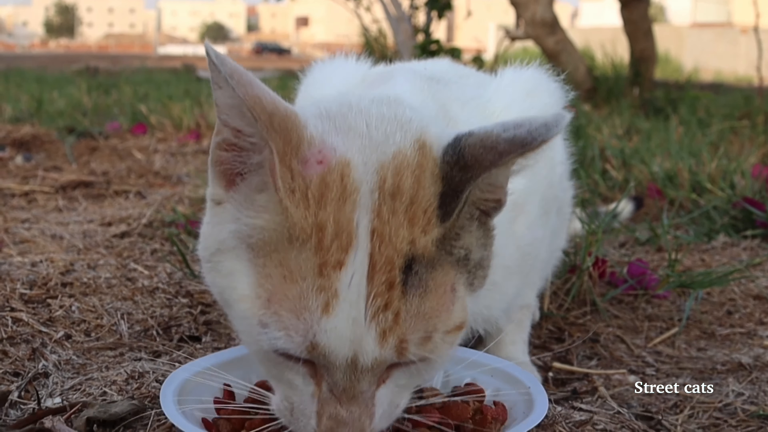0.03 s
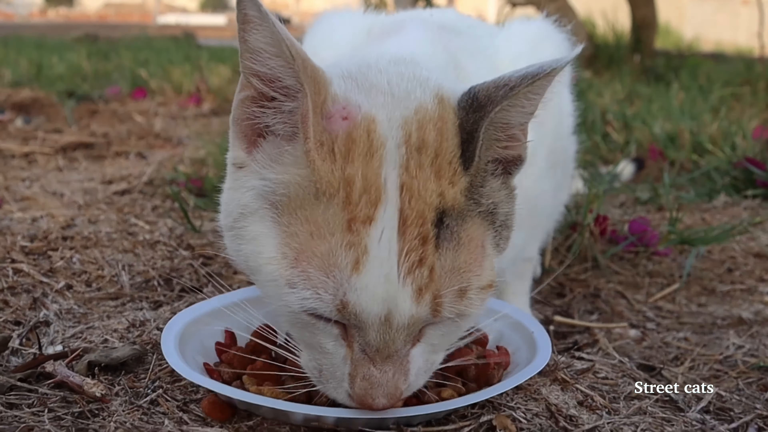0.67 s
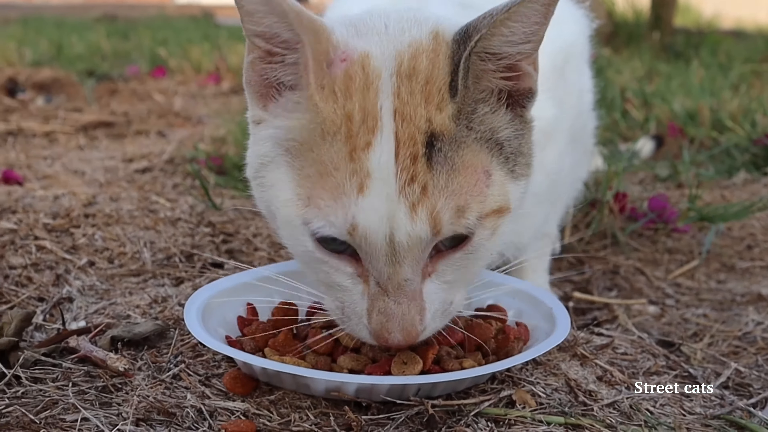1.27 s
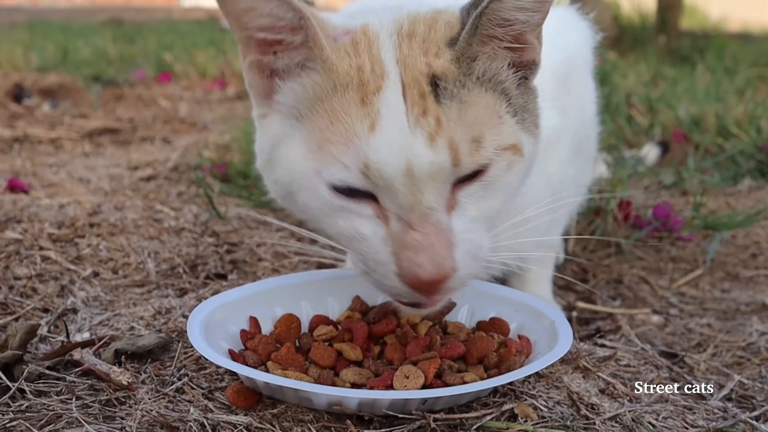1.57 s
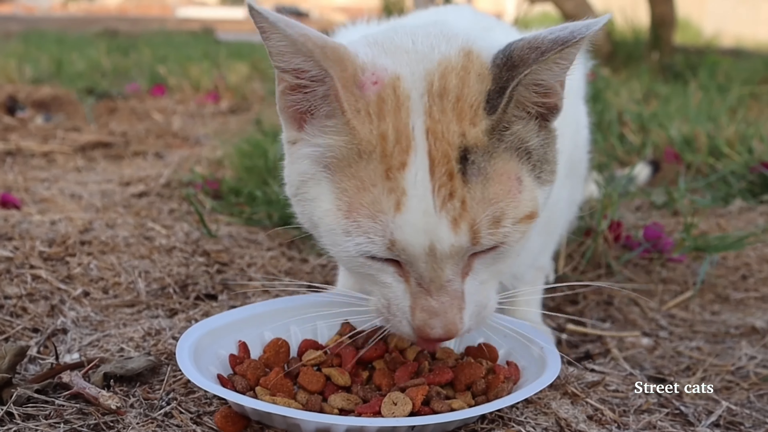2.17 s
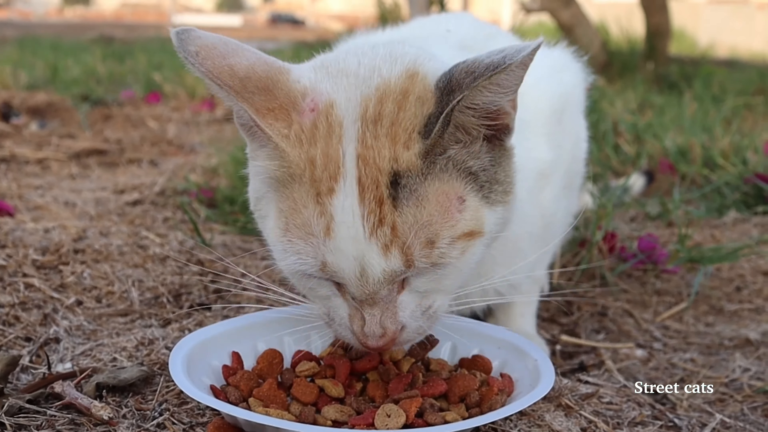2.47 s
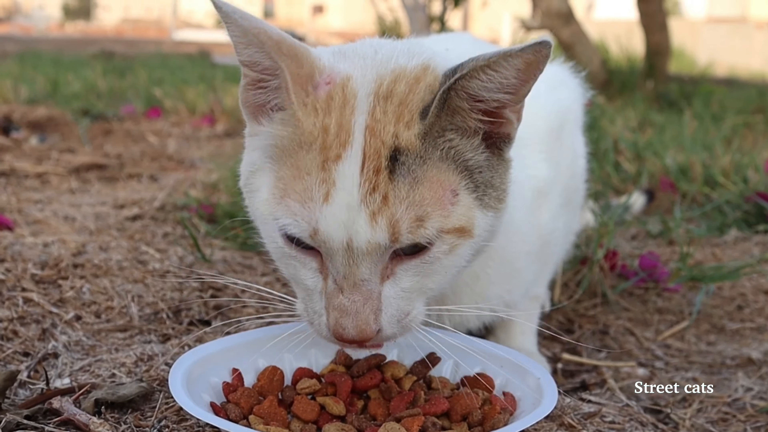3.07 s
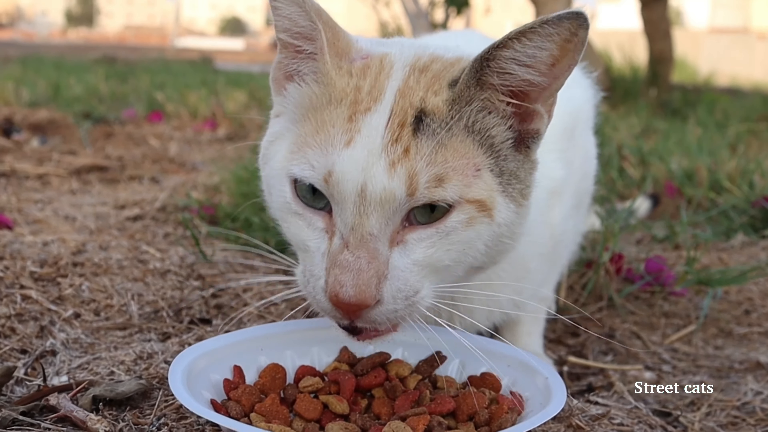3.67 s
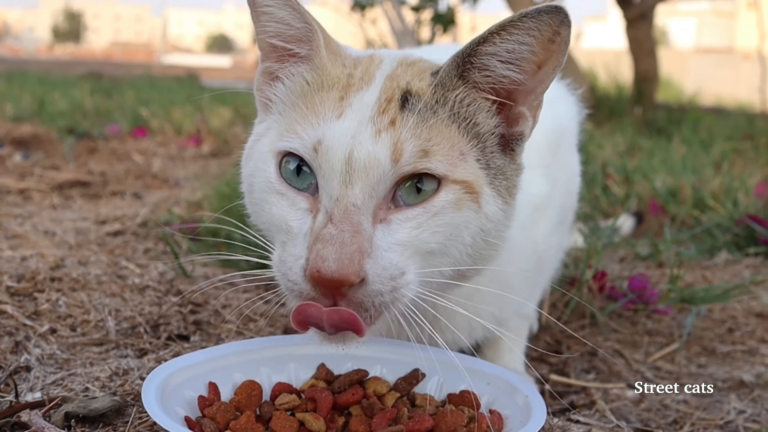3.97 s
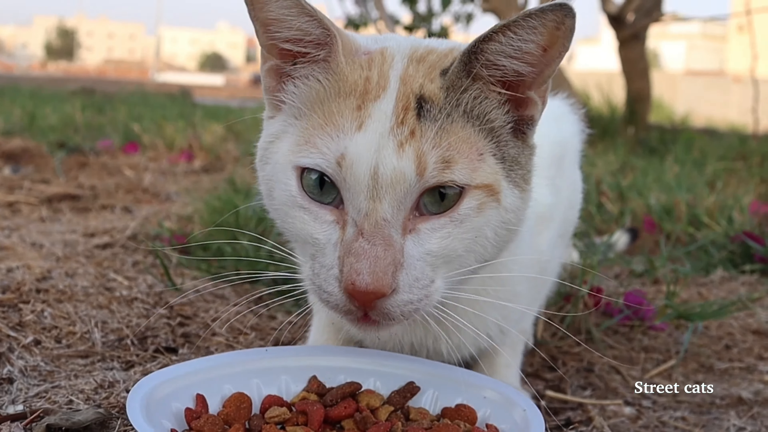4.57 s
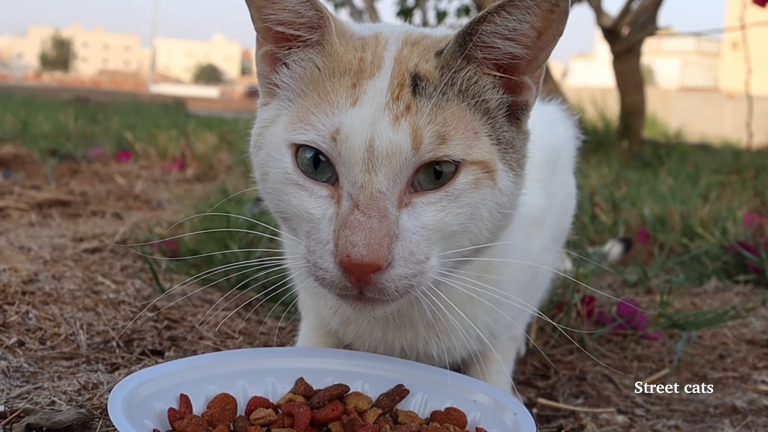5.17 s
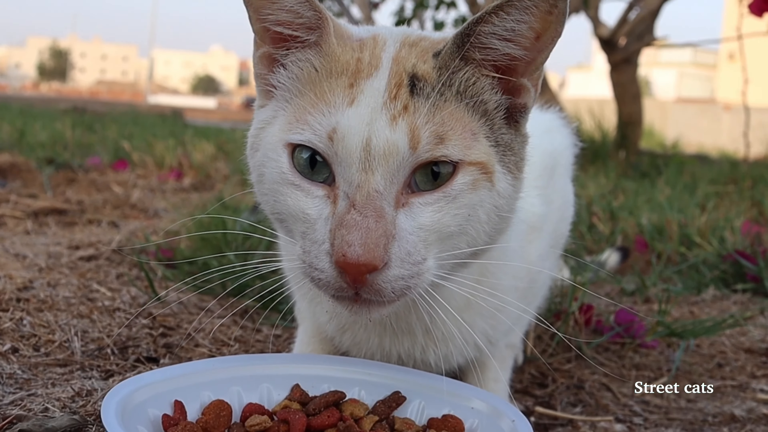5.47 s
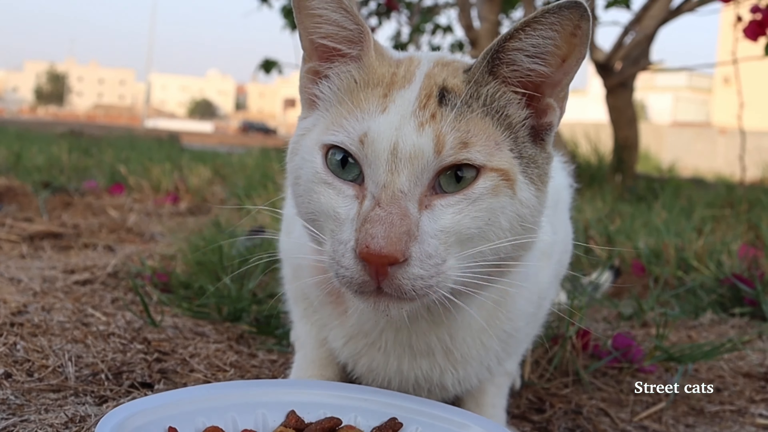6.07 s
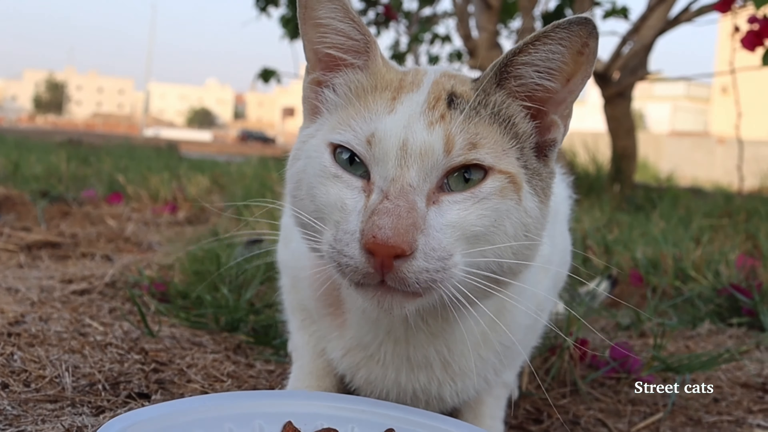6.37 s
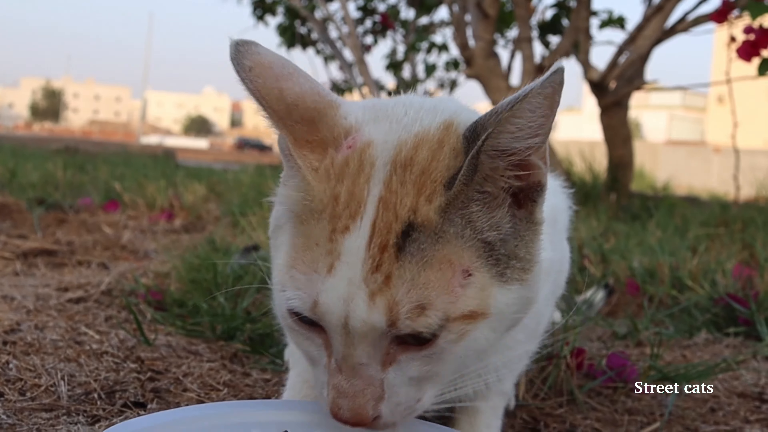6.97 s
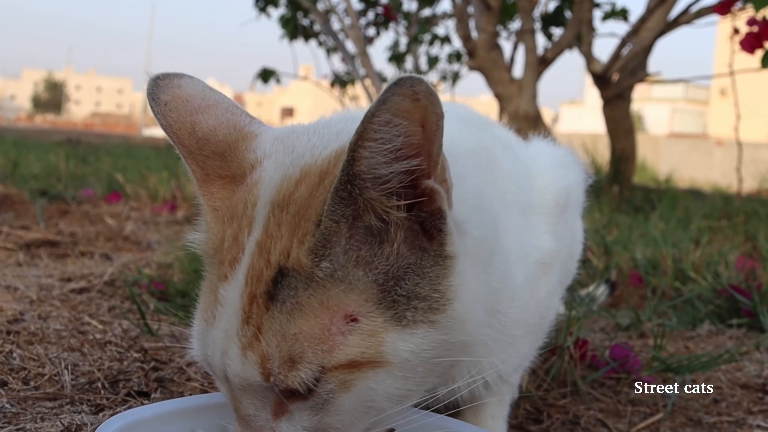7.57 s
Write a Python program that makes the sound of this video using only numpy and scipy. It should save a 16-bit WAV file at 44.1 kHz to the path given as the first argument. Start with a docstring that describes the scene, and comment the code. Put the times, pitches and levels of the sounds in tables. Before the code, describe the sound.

A cat eats close to the microphone in a garden. A steady low town rumble and faint hiss run throughout, with small birds chirping, twittering and giving thin buzzy notes some way off, slightly echoing. From about 0.4 to 0.8 seconds, dry kibble rattles and knocks in a plastic dish, mostly on the left. Tooth taps, soft wet smacks and chewing ticks follow from 1 to 1.6 seconds, with more smacks around 2.3. At 2.6 seconds comes one sharp crunch, the loudest sound, followed by smaller cracks until 2.9. The tongue smacks lightly at 3.3 and just before 4 seconds. Then the birds and rumble are mostly alone, apart from single licks near 5.9 and 6.3 seconds. The chirping gets a little busier just after 7 seconds. From 7.4 to 7.8 seconds, the cat stirs the pellets again and its teeth click quickly against them.

```python
"""In a garden, a cat eats dry kibble from a plastic dish, close to two spaced microphones.
Pellets fracture between its teeth, impacts excite short damped rings, and its tongue smacks.
Its muzzle stirs the heap, and the dish's resonances colour the rattle.
Some way off, small birds chirp and wheeze in frequency-modulated tones that echo from walls and trees,
over the steady rumble of a town and a faint microphone hiss."""
import sys
import numpy as np
from scipy import signal
from scipy.fft import rfft, irfft
from scipy.io import wavfile
from scipy.ndimage import uniform_filter1d

SR = 44100
rng = np.random.default_rng(int(sys.argv[2]) if len(sys.argv) > 2 else 0)


def unload_audio(sound):
    """Save the sound as a 16-bit wav file, at the path given as the first command line argument."""
    columns = np.transpose(np.atleast_2d(sound))
    # keep every value between -1 and 1, then stretch to whole-number steps
    steps = np.round(np.clip(columns, -1, 1) * 32767)
    wavfile.write(sys.argv[1], SR, steps.astype(np.int16))


N = 344421
BURST_SAMPLES = 2048
HZ, AGE = np.fft.rfftfreq(BURST_SAMPLES, 1 / SR), np.arange(BURST_SAMPLES) / SR  # a burst's f/Hz, t/s


# modes of the jaw: f/ring f, level/dB
JAW_MODES = [(1, 0), (.65, -2)]
# spectrum of the splinters: f/Hz, level/dB
SPLINTER_SPECTRUM = [(400, -64.5), (950, -19), (1250, 3.5), (2000, 4.5), (3000, 3), (3800, 0), (5000, 5.5),
                     (6000, 1), (6700, -2), (8000, -1), (9300, -23), (11500, -18.5), (14700, -5),
                     (15700, -11), (16500, -24)]
# directivity of a bite, its top treble beamed to the right: f/Hz, L-R/dB
BITE_DIRECTIVITY = [(7000, 1), (11500, -26), (15000, -25.5)]
# pellets breaking: t/s, ring level/dB, ring f/Hz, splinter level/dB, splinter decay/s, L-R/dB
CRACKS = [(.793, -39, 1800, -39, .002, -5), (1.2062, -47, 2000, -34, 0.0013, -14),
          (2.5993, -11.5, 1980, -16.5, .0009, -4), (2.6096, -21, 2050, -20, .001, -4),
          (2.619, -47, 2200, -33, 0.0018, 1), (2.7486, -35, 1800, -23, 0.0014, 2),
          (2.7977, -37, 3400, -35, 0.00041, 0), (2.8957, -32.5, 3400, -27.5, 0.0016, 5)]

def cracks(ring_decay_s=.0005, rise_s=.00035):
    """Brittle fracture: a pellet gives way, and the jaw rings briefly under a spray of splinters."""
    out = np.zeros((2, N))
    colour = read(SPLINTER_SPECTRUM, HZ) + np.array([[.5], [-.5]]) * read(BITE_DIRECTIVITY, HZ)
    for s, ring_db, hz, splinter_db, splinter_decay_s, pan_db in CRACKS:
        jaw = sum(amp(db) * np.sin(2 * np.pi * ratio * hz * AGE) for ratio, db in JAW_MODES)
        ring = np.gradient(-jaw * envelope(ring_decay_s, rise_s))
        splinters = coloured(burst(splinter_decay_s, rise_s, apart=.47), colour)
        add(out, s, amp(ring_db) * panned(pan_db) * one_ms(ring))
        add(out, s, amp(splinter_db) * panned(pan_db) * one_ms(splinters))
    return out


# spectrum of a struck pellet: f/Hz, level/dB
PELLET_SPECTRUM = [(300, -19), (1000, 0.5), (1450, 7), (2000, 6.5), (3200, 6), (5600, -1), (7500, -10),
                   (10000, -10), (13000, -13.5), (16000, -25)]
# teeth closing on a pellet: t/s, level/dB, ring f/Hz, tilt/(dB per octave), L-R/dB
TOOTH_TAPS = [(.984, -29.5, 1140, 0.5, 7), (1.2215, -28, 1480, 5, 12), (2.363, -35, 2010, -7, -2),
              (2.389, -36.5, 3220, -3, -4), (7.4372, -34, 3330, -3, -5), (7.4574, -26, 2700, -12, -6),
              (7.5004, -26.5, 2760, -14, -4), (7.516, -35, 3300, -10, -4), (7.571, -35, 2040, -6, -4),
              (7.5984, -29, 2400, -4, -3), (7.6138, -33, 3900, 5, -2), (7.6225, -34, 3400, 1, 1),
              (7.6598, -33, 1590, -3, -4), (7.6962, -36.5, 1890, -6, -6), (7.7353, -31, 2340, -11, 1),
              (7.744, -31.5, 2930, -3, -4), (7.7962, -36, 2600, 1.5, -1)]

def tooth_taps():
    """Impact excitation: a tooth strikes a pellet and sets off a short, damped ring."""
    out = np.zeros((2, N))
    for s, db, hz, tilt_db, pan_db in TOOTH_TAPS:
        colour = tilted(PELLET_SPECTRUM, tilt_db)
        tap = contact(colour, hz, decay_s=.0027, rise_s=.00013, ring_db=11, ring_octaves=.37)
        add(out, s, amp(db) * panned(pan_db) * tap)
    return out


# modes of the plastic dish: f/Hz, half width/Hz, lift/dB
DISH_MODES = [(1980, 190, 7.5), (3160, 57, 6.5), (3940, 110, 2), (4860, 110, 7), (5540, 260, 9),
              (6800, 200, 7)]

def dish_lift():
    """Modal resonance: each mode of the dish adds a bell-shaped peak, in dB, to the spectrum."""
    return sum(db / (1 + ((HZ - hz) / half_width) ** 2) for hz, half_width, db in DISH_MODES)


# pellets hitting the dish: t/s, level/dB, ring f/Hz, tilt/(dB per octave), L-R/dB
KNOCKS = [(.4063, -36, 5470, 10, 9), (.4136, -35, 5400, 8, 8), (0.4236, -28, 2880, 9, -3),
          (0.4267, -26, 2100, 6, 4), (0.4343, -28, 4000, 1, 10), (0.439, -23, 3800, 4, 6),
          (.4445, -31, 3000, 5, 7), (.4771, -33, 4660, 0, 8), (0.4833, -31, 3120, -1, 9),
          (0.5117, -37, 5400, 2, 10), (0.5185, -32.5, 5400, 2, 14), (0.541, -40, 5500, 4, 12),
          (.55, -29.5, 5250, 3, 14), (.5754, -39, 5400, 0, 6), (0.601, -31, 1850, -4, -3),
          (.6845, -46, 9000, 12, 8), (0.7155, -30.5, 2130, 12, 8), (.7208, -27, 2570, 9.5, 11),
          (0.73, -28, 1950, -9, -5), (.778, -35, 1900, 8, -8), (0.7935, -23.5, 1670, -1, -3),
          (0.803, -35, 2700, 5, 5), (0.812, -35, 2200, 6, 6), (.819, -34, 2200, 6, 6),
          (0.8271, -37, 3100, 10, 6)]

def knocks():
    """Impact on a resonator: a pellet's knock is coloured by the modes of the dish."""
    out = np.zeros((2, N))
    for s, db, hz, tilt_db, pan_db in KNOCKS:
        colour = tilted(PELLET_SPECTRUM, tilt_db) + dish_lift()
        knock = contact(colour, hz, decay_s=.0018, rise_s=.00021, ring_db=11.5, ring_octaves=.4)
        add(out, s, amp(db) * panned(pan_db) * knock)
    return out


# the muzzle shoving the heap:
# centre t/s, half length/s, level/dB, tilt/(dB per octave), L-R/dB, share of the dish's lift
SHOVES = [(0.416, .005, -41, 3, 11, .9), (0.434, 0.0095, -33.5, 3, 15, 1), (0.455, .004, -41, 3, 8, .8),
          (0.482, 0.0078, -43.5, 4, 9, 1), (0.536, 0.049, -48, 0, 3, 1), (0.604, 0.0059, -46, -7, 2, .5),
          (0.723, 0.017, -38, -0.5, 10, 0.9), (0.777, .042, -44.5, -3, -3, 0.8),
          (0.824, 0.0065, -39, 2.5, 6, 0.5), (7.45, 0.011, -38, -12, -3, 0.1),
          (7.499, 0.02, -42.5, -6.5, -2, 0), (7.582, 0.029, -43.5, -7, -2, .3),
          (7.618, 0.015, -38.5, 1.5, -6, 0), (7.734, 0.014, -47.5, -4, -3, .3)]

def shoves(contacts_per_s=2000, spread_db=2, pellets=6):
    """Granular noise: many tiny random collisions among a few pellets merge into a swelling rattle."""
    out = np.zeros((2, N))
    t = np.arange(-SR // 10, SR // 10) / SR
    for s, half_s, db, tilt_db, pan_db, dish_share in SHOVES:
        swell = np.exp(-.5 * (t / half_s) ** 2)
        sizes = amp(spread_db * rng.standard_normal((pellets, len(t))))
        hits = rng.random(sizes.shape) < contacts_per_s / pellets / SR
        rattle = sum(signal.fftconvolve(train[None], burst(decay_s=.00072, rise_s=.0003), axes=1)
                     for train in sizes * hits * swell)
        rattle = coloured(rattle, tilted(PELLET_SPECTRUM, tilt_db) + dish_share * dish_lift())
        swell_rms = np.sqrt(np.sum(swell ** 2) / rattle.shape[1])
        add(out, s + t[0], amp(db) * panned(pan_db) * unit_rms(rattle) * swell_rms)
    return out


# spectrum of a wet smack: f/Hz, level/dB
TONGUE_SPECTRUM = [(500, 8.5), (1500, 4), (3000, 0), (5500, 0.5), (8000, -4), (11000, -8), (15500, -5)]
# shelf in the top treble: f/Hz, share of a smack's treble lift
TREBLE_SHELF = [(9000, 0), (14000, 1)]
# lean of the smacks as the head turns: t/s, L-R/dB
FACING = [(1, 1), (1.4, 8), (3.9, 10), (5.9, -11.5), (7, -32)]
# spells of chewing: start t/s, end t/s, tick level/dB
CHEWS = [(1.195, 1.624, -41), (3.805, 3.962, -49)]
# tongue and lips: t/s, level/dB, ring f/Hz, tilt/(dB per octave), treble lift/dB
SMACKS = [(.9586, -35, 3100, 0, -7), (1.2575, -35, 5600, -2, -3), (1.2898, -34, 2100, -2.5, -3),
          (1.338, -35.5, 3000, 0, -3), (1.4593, -34, 6800, -6, 3), (1.4685, -41, 5600, -1, -3),
          (1.5953, -31, 6800, -6, 0), (1.603, -38, 6500, -1, 8), (2.2405, -40, 6900, -2, -15),
          (2.2485, -41, 5400, -1, -15), (2.3925, -34, 6750, -3, -18), (2.403, -37, 5600, -2, -17),
          (3.2856, -36, 5800, -4.5, -10), (3.9232, -38.5, 5900, -2, -12), (3.9292, -34.5, 6100, 2, -10),
          (3.9415, -31, 1990, -3, -12), (3.9475, -34, 5250, 5, -13), (5.8823, -34.5, 5900, 1, 4),
          (6.2815, -38.5, 8400, 10, -5)]

def smacks(tick_hz=7000, tick_tilt_db=-1, spread_db=3, ticks_per_s=24):
    """Separation of wet surfaces: tongue and lips part in noise bursts, and saliva ticks faintly."""
    out, events = np.zeros((2, N)), list(SMACKS)
    for start, end, db in CHEWS:
        for when, size in rng.random((ticks_per_s, 2))[:round(ticks_per_s * (end - start))]:
            tick_db = db + spread_db * (2 * size - 1)
            events.append((start + when * (end - start), tick_db, tick_hz, tick_tilt_db, 0))
    for s, db, hz, tilt_db, treble_db in events:
        colour = tilted(TONGUE_SPECTRUM, tilt_db) + treble_db * read(TREBLE_SHELF, HZ)
        smack = contact(colour, hz, decay_s=.0042, rise_s=.0009, ring_db=6, ring_octaves=.12)
        pan_db = np.interp(s, *np.transpose(FACING))
        add(out, s, amp(db) * panned(pan_db) * smack)
    return out


def contact(colour, hz, decay_s, rise_s, ring_db, ring_octaves):
    """Source and filter: a noise burst takes on a colour in dB and one resonance at hz."""
    resonance = ring_db / (1 + (np.log2((HZ + 1) / hz) / ring_octaves) ** 2)
    return one_ms(coloured(burst(decay_s, rise_s), colour + resonance))


def burst(decay_s, rise_s, apart=1):
    """Partial coherence: a dying noise, shared by both microphones, plus a part of their own."""
    noise = rng.standard_normal(BURST_SAMPLES) + apart * rng.standard_normal((2, BURST_SAMPLES))
    return noise * envelope(decay_s, rise_s)


def envelope(decay_s, rise_s):
    """Damping: after a quick rise, the amplitude decays exponentially."""
    return np.exp(-AGE / decay_s) * (1 - np.exp(-AGE / rise_s))


# sparrow-like arches of pitch: t/s, length/s, top f/Hz, place of the top (0-1), level/dB
CHIRPS = [(0.13, 0.055, 6500, .45, -48.5), (.234, .038, 5400, .55, -51), (.355, .034, 4400, .4, -48),
          (1.39, 0.04, 6800, .3, -52), (1.468, .04, 5700, 0.4, -54), (1.487, 0.037, 4350, .4, -51),
          (2.267, 0.055, 4900, 0.4, -44), (2.32, .044, 4420, .5, -43), (2.424, .052, 4700, .4, -48),
          (2.889, 0.045, 4720, 0, -41), (3.05, 0.046, 4760, 0.25, -42.5), (3.609, 0.053, 4800, 0.34, -46),
          (3.622, 0.038, 6800, .8, -57), (3.765, 0.052, 4600, 0.4, -42.5), (4.986, .045, 4920, 0.31, -45.5),
          (5.168, 0.043, 4680, .45, -46), (5.971, 0.045, 4600, 0.7, -43), (6.125, .026, 6600, .65, -50),
          (6.195, 0.049, 4400, .5, -49), (6.592, 0.04, 6650, .55, -53), (6.712, 0.033, 4950, 0.73, -46)]
# sharp points of pitch: t/s of the point, rise/s, fall/s, top f/Hz, level/dB
FLICKS = [(1.761, .012, .008, 5000, -48), (2.03, .014, .005, 5200, -46), (2.08, .014, .011, 5300, -47.5),
          (3.022, .01, .011, 4750, -48), (3.216, .01, .014, 6650, -55), (4.131, .012, .0092, 4570, -39.5),
          (4.438, .003, .013, 5060, -45), (4.506, .02, .01, 4750, -46), (5.506, .004, .012, 4500, -49),
          (5.564, .012, 0.0074, 4500, -43), (5.722, .007, .004, 4930, -39.5),
          (7.171, .0066, .011, 4680, -39.5), (7.197, .013, .016, 3180, -42),
          (7.368, .016, 0.021, 3540, -37), (7.391, .01, .012, 3700, -42), (7.413, .01, .019, 3630, -41)]
# straight glides: t/s, length/s, start f/Hz, end f/Hz, level/dB
SLIDES = [(0.93, .012, 4900, 5850, -49), (1.618, 0.071, 5200, 3360, -51), (1.8, .03, 6050, 6600, -57),
          (2.245, 0.029, 6000, 6600, -52), (2.49, .028, 6700, 6400, -58), (2.668, .03, 5900, 6400, -59),
          (2.768, 0.038, 5250, 4600, -46), (2.796, 0.023, 3400, 3800, -45), (2.974, 0.025, 3900, 3320, -40),
          (2.998, .016, 3350, 3650, -44), (3.036, 0.019, 3900, 2950, -41),
          (3.769, 0.0058, 5300, 3700, -36.5), (4.203, .018, 3400, 4030, -41), (4.234, .02, 3650, 3350, -46),
          (5.692, 0.027, 4450, 5050, -50), (5.946, .023, 5200, 4700, -49), (5.976, 0.021, 3350, 3470, -43),
          (6.013, 0.021, 3950, 3070, -40.5), (6.434, .028, 4400, 5100, -55), (7.12, .03, 3750, 3480, -44),
          (7.143, .036, 3050, 2840, -42), (7.195, .022, 2880, 2390, -46)]
# diving calls: t/s, top f/Hz, level/dB
DIVES = [(4.044, 5000, -40), (5.634, 5220, -42), (7.084, 5030, -39.5)]

def near_birds():
    """Frequency modulation: each kind of call is a whistle with its own pitch contour."""
    out = np.zeros((1, N))
    for s, length, top_hz, place, db in CHIRPS:
        add(out, s, amp(db) * chirp(length, top_hz, place))
    for s, rise_s, fall_s, top_hz, db in FLICKS:
        add(out, s - rise_s, amp(db) * flick(rise_s, fall_s, top_hz))
    for s, length, start_hz, end_hz, db in SLIDES:
        hz = np.linspace(start_hz, end_hz, round(length * SR))
        add(out, s, amp(db) * unit_rms(whistle(hz, waver=.019)))
    for s, top_hz, db in DIVES:
        add(out, s, amp(db) * dive(top_hz))
    return out


def chirp(length, top_hz, place, sag_octaves=.21, gap_hz=526, lower_db=1.5):
    """Biphonation: two voices, a constant step apart, rise to a top and sink again."""
    u = np.linspace(0, 1, round(length * SR))
    from_top = np.interp(u, [0, np.clip(place, .1, .9), 1], [-1, 0, 1])
    hz = top_hz * 2 ** (-sag_octaves * from_top ** 2)
    upper, lower = whistle(hz, waver=.006), whistle(hz - gap_hz, waver=.006)
    return unit_rms(upper + amp(lower_db) * lower)


def flick(rise_s, fall_s, top_hz, depth=.26, sweep_s=.0074):
    """Exponential sweeps: a thin note shoots up to a cusp and drops away."""
    t = np.arange(-rise_s, fall_s, 1 / SR)
    sag = depth * (1 - np.exp(-abs(t) / sweep_s))
    return unit_rms(whistle(top_hz * (1 - sag), waver=.0047))


def dive(top_hz, length=.045, turn=.44, climb_depth=.068, drop_depth=.306, swell_db=8):
    """Joint pitch and amplitude modulation: a rough note climbs a little, swells and suddenly drops."""
    u = np.linspace(0, 1, round(length * SR))
    climb = np.maximum(1 - u / turn, 0)
    drop = np.maximum(u - turn, 0) / (1 - turn)
    hz = top_hz * (1 - climb_depth * climb ** 2 - drop_depth * drop)
    return unit_rms(whistle(hz, waver=.025, smooth_samples=40) * amp(swell_db * (u - drop / 2)))


def whistle(hz, waver, smooth_samples=60):
    """Phase as the integral of frequency: a tone follows hz, wavers at random and fades in and out."""
    wavering_hz = hz * (1 + waver * jitter(len(hz), smooth_samples))
    phase = 2 * np.pi * np.cumsum(wavering_hz) / SR
    return (np.sin(phase) * signal.windows.tukey(len(hz), .15))[None]


def jitter(samples, smooth_samples):
    """Moving average: white noise is smoothed into a slower random wobble."""
    return unit_rms(uniform_filter1d(rng.standard_normal(SR // 2), smooth_samples))[:samples]


# constant faint twitter, with one fainter bout from 2.1 to 3.9 s: start t/s, end t/s, level/dB
TWITTER = [(0, 7.8, -50), (2.1, 3.9, -56), (5.1, 4.6, -56)]

def flock(spread_db=5, low_hz=3500, span_hz=2000, short_s=.0183, long_s=.053, calls_per_s=22):
    """Superposition: farther birds' random chirps and flicks, the higher ones fainter, form a twitter."""
    out = np.zeros((1, N))
    for start, end, db in TWITTER:
        for k, (when, pitch, stretch, place, size) in enumerate(rng.random((200, 5))):
            s = start + (k + when) / calls_per_s
            if s < end:
                span = short_s + stretch * (long_s - short_s)
                hz = low_hz + pitch * span_hz
                call = flick(place * span, (1 - place) * span, hz) if k % 2 else chirp(span, hz, place)
                add(out, s, amp(db + spread_db * (size - pitch)) * call)
    return out


# buzzy notes that sag in pitch: t/s, length/s, start f/Hz, level/dB
WHEEZES = [(.29, .09, 6420, -56), (0.968, .075, 6100, -50.5), (1.02, 0.084, 5570, -53),
           (1.932, 0.11, 5900, -53.5), (2.802, 0.087, 5820, -51), (4.084, .095, 5870, -49.5),
           (4.177, .09, 4900, -54), (4.785, .09, 5920, -49), (4.86, .08, 5710, -52),
           (5.622, .08, 6050, -53), (5.724, 0.087, 5370, -55), (6.35, 0.096, 5950, -54.5),
           (6.452, .075, 5330, -63), (7.268, 0.13, 5930, -52.5)]

def wheezes(shake_hz=61.2, shake_depth=.17, uneven=.84, sag=.0217, fade_db=-2):
    """Modulation sidebands: a fast, uneven, deepening shake of pitch makes a far bird's note buzz."""
    out = np.zeros((1, N))
    for s, length, start_hz, db in WHEEZES:
        u = np.linspace(0, 1, round(length * SR))
        pace = 1 + uneven * jitter(len(u), smooth_samples=400)
        shake = np.sin(np.pi * np.cumsum(shake_hz * pace) / SR) ** 2 * np.linspace(.5, 1, len(u))
        hz = start_hz * (1 - sag * u ** 2 - shake_depth * np.sqrt(u) * shake)
        note = whistle(hz, waver=.0096, smooth_samples=30) * amp(fade_db * u)
        add(out, s, amp(db) * unit_rms(note))
    return out


def garden(song, direct_db, echo_db, t60, lag_samples=7):
    """Multipath: song reaches the left microphone first and comes back from walls and trees."""
    direct = np.vstack([song, np.roll(song, lag_samples)])
    return amp(direct_db) * direct + amp(echo_db) * echoes(song, t60)


def echoes(x, t60):
    """Reverberation: scattered reflections, different at each microphone, fall 60 dB in t60 seconds."""
    t = np.arange(SR) / SR
    reflections = rng.standard_normal((2, SR)) * (rng.random((2, SR)) < .1) * amp(-60 * t / t60)
    return signal.fftconvolve(x, unit_rms(reflections) / np.sqrt(SR), axes=1)[:, :N]


# spectral density of the town's rumble: f/Hz, level/dB
TOWN_RUMBLE = [(15, -44), (27, -22), (40, -14.5), (50, -8.5), (62, -4), (90, -0.5), (120, -1), (200, 1),
               (290, -6), (460, -9), (680, -18), (850, -30.5), (1400, -53)]
# spectral density of the steady, faint microphone hiss: f/Hz, level/dB
MIC_HISS = [(470, -15.5), (800, -1), (1070, 0.5), (1610, -5), (1720, -4), (1970, -4), (2130, -5.5),
            (2980, -8.5), (4080, -9.5), (4990, -11), (5380, -12), (9330, -27), (14800, -26), (16000, -45)]
# likeness of the background at the two microphones: f/Hz, coherence
COHERENCE = [(60, 0.98), (130, 1), (290, 0.93), (640, 0.73), (1400, 0.23), (3000, 0.43), (7000, 0.028),
             (15000, 0.029)]
# lead of the left microphone: f/Hz, phase/rad
PHASE_LEAD = [(0, 0), (100, .02), (500, .2), (1120, .7), (2240, 2.7), (4300, 4.4), (7000, 7)]

def background(spectrum, level_db, patch_db, pan_db, frame=4096, hop=1024):
    """Coherence: steady noise with drifting patches is alike at both microphones in the bass."""
    hz = np.fft.rfftfreq(frame, 1 / SR)
    a, b, c, d, patches = rng.standard_normal((5, N // hop + 5, len(hz)))
    patches = uniform_filter1d(patches, size=5, axis=0)  # smooth in time
    patches = unit_rms(uniform_filter1d(patches, size=50, axis=1))  # and in frequency
    left, independent = a + 1j * b, c + 1j * d
    coherence = read(COHERENCE, hz)
    lag = np.exp(-1j * read(PHASE_LEAD, hz))
    right = (coherence * left + np.sqrt(1 - coherence ** 2) * independent) * lag
    spectra = np.array([left, right]) * amp(read(spectrum, hz) + patch_db * patches)
    _, noise = signal.istft(spectra, nperseg=frame, noverlap=frame - hop, time_axis=1, freq_axis=2)
    return amp(level_db) * panned(pan_db) * unit_rms(noise[:, :N])


def coloured(x, db):
    """Minimum-phase filtering: a causal response with the gain db at the frequencies HZ."""
    cepstrum = irfft(np.log(amp(db)))
    cepstrum[..., 1:BURST_SAMPLES // 2] *= 2
    cepstrum[..., BURST_SAMPLES // 2 + 1:] = 0
    response = irfft(np.exp(rfft(cepstrum)))
    return signal.fftconvolve(x, np.atleast_2d(response), axes=1)


def tilted(spectrum, tilt_db):
    """Spectral tilt: a colour gains tilt_db per octave from 3 to 9 kHz."""
    return read(spectrum, HZ) + tilt_db * np.log2(np.clip(HZ, 3000, 9000))


def read(points, hz):
    """Interpolation of a table on a log-frequency axis."""
    f, value = np.transpose(points)
    return np.interp(np.log(hz + 1), np.log(f + 1), value)


def amp(db):
    """Amplitude ratio of a level in decibels."""
    return 10 ** (np.asarray(db) / 20)


def unit_rms(x):
    """Power normalisation to rms 1."""
    return x / np.sqrt(np.mean(x ** 2) + 1e-20)


def one_ms(x):
    """Energy normalisation: a click gets the energy of one millisecond at rms 1."""
    return unit_rms(x) * np.sqrt(SR / 1000 / x.shape[-1])


def panned(pan_db):
    """Constant-power panning: two gains, the left pan_db above the right."""
    return unit_rms(amp([[pan_db / 2], [-pan_db / 2]]))


def add(mix, s, sound):
    """Superposition: a sound joins the mix at time s."""
    part = mix[:, max(round(s * SR), 0):][:, :sound.shape[1]]
    part += sound[:, :part.shape[1]]


def scene():
    """Direct-to-reverberant ratio: the near cat is almost dry; the farthest bird is largely echo."""
    cat = shoves() + knocks() + tooth_taps() + smacks() + cracks()
    cat += amp(-20) * echoes(cat, t60=.05)
    song = garden(near_birds() + flock(), direct_db=-6, echo_db=-13.5, t60=.25)
    far_song = garden(wheezes(), direct_db=-6.5, echo_db=-5.5, t60=.4)
    town = background(TOWN_RUMBLE, level_db=-34.5, patch_db=.03, pan_db=.5)
    mic_hiss = background(MIC_HISS, level_db=-48, patch_db=1.44, pan_db=1.2)
    return cat + song + far_song + town + mic_hiss


def record(dry, cutoff_hz=16350):
    """Band limiting: a linear-phase low-pass filter removes the highest treble."""
    lowpass = signal.firwin(511, cutoff_hz, window=("kaiser", 9), fs=SR)
    return signal.oaconvolve(dry, lowpass[None], "same")


dry = scene()
out = record(dry)
unload_audio(out)
```